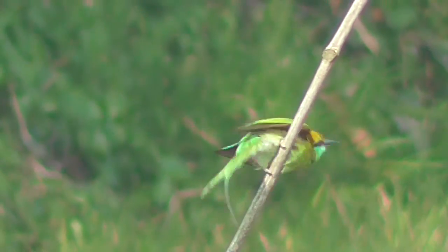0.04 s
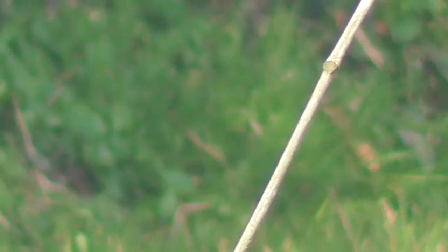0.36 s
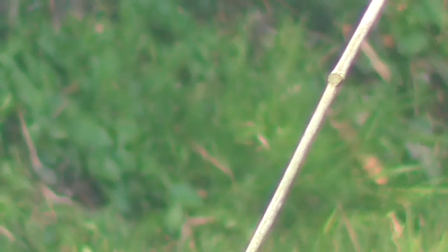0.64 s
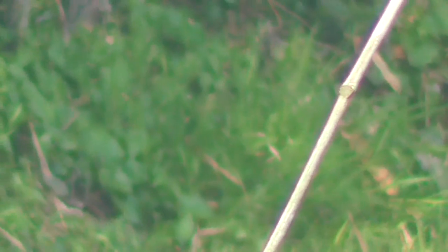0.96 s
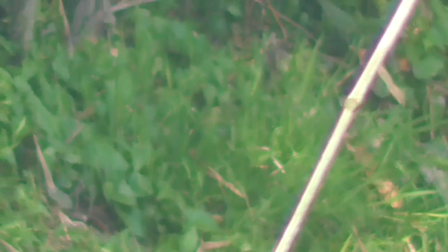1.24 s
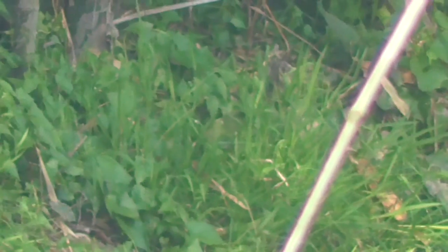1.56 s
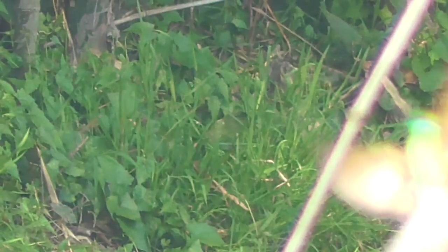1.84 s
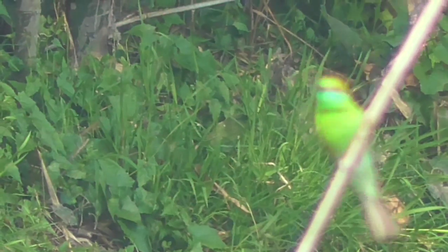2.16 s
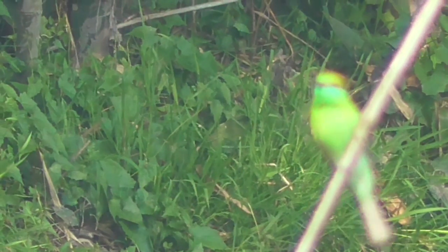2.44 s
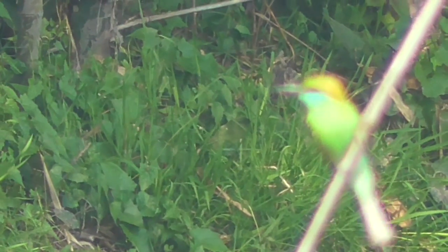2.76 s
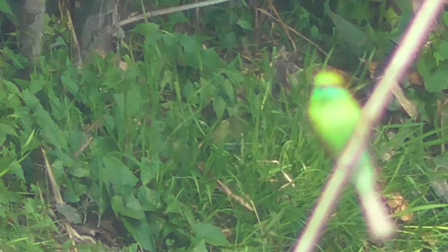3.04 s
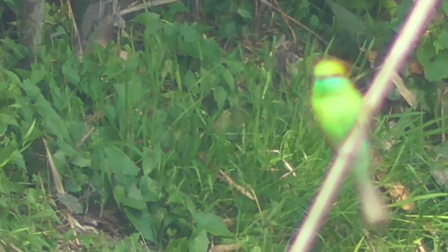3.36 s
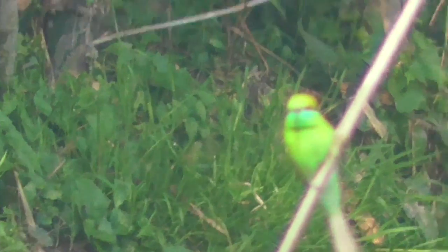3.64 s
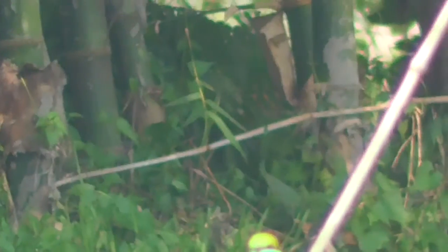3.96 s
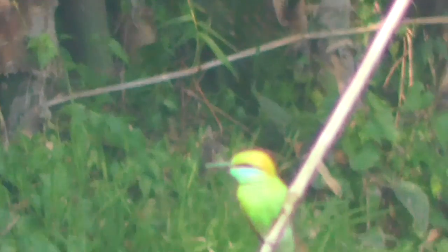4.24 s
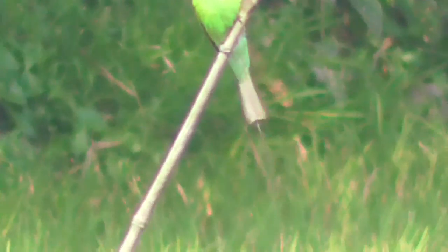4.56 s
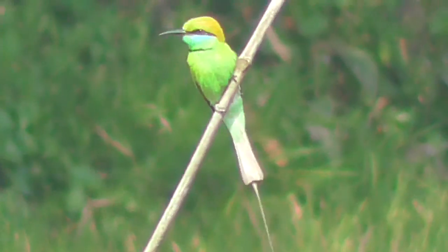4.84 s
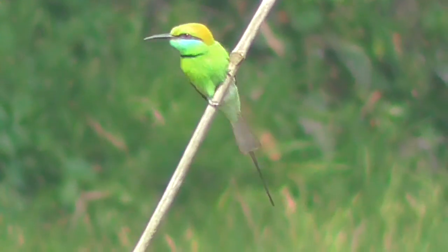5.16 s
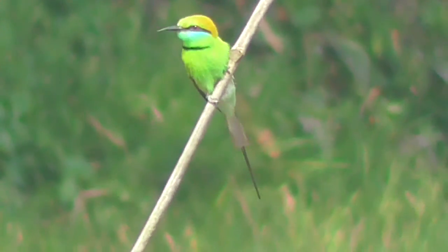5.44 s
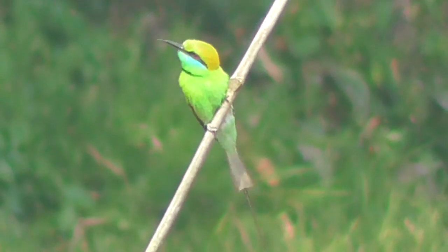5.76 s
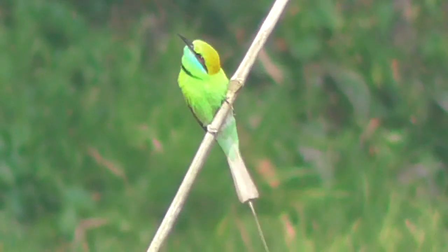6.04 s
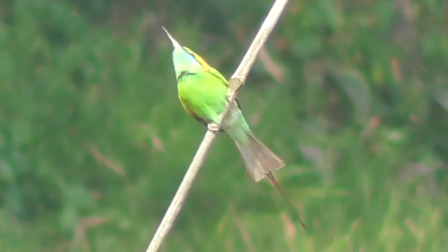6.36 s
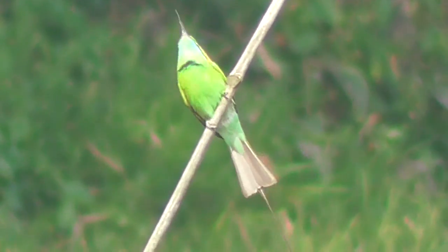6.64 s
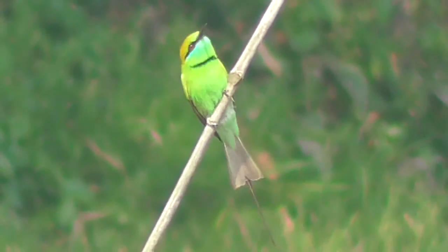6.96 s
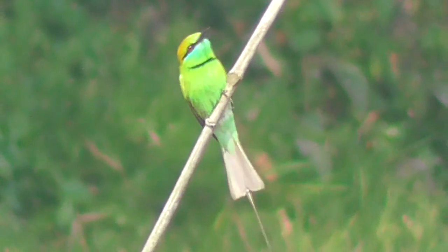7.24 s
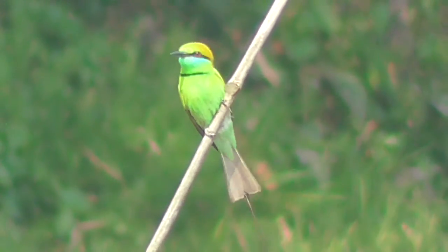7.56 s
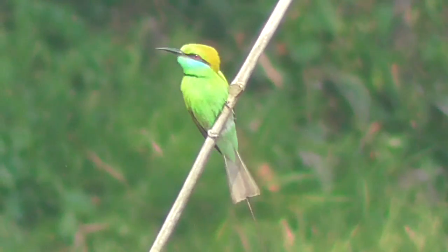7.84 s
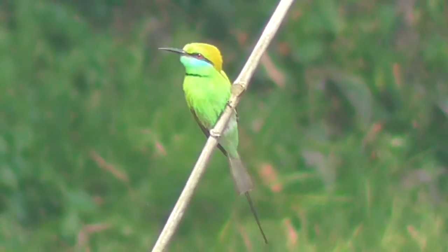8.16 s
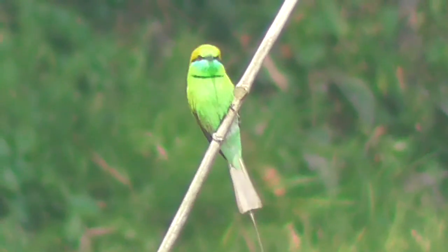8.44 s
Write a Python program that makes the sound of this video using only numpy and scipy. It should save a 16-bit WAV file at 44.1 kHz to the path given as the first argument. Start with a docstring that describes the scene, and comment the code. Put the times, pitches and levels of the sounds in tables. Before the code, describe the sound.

Low wind rumble swells and drops on the microphone at a meadow's edge, with dull bumps in the stronger gusts. Behind it lie a steady far traffic drone and a thin hiss. Small birds are heard faintly from the bushes: first a few quick chirps, then soft whistles and a series of paired high notes in the second half. Slight leaf rustles come close by, and distant brakes squeal softly twice.

```python
"""Gusts and small birds at a meadow's edge

Gusts buffet a stereo microphone: eddies rumble and thump on its two ports and once hoot across an edge.
Small birds whistle chirps, paired notes and soft slurs that scatter through a thicket.
Dry leaves rustle and tick close by. Far traffic, a motor's hum and two brake-like squeals lie below."""
import sys
import numpy as np
from scipy import signal
from scipy.fft import rfft, irfft
from scipy.io import wavfile
from scipy.ndimage import uniform_filter1d

SR = 44100
rng = np.random.default_rng(int(sys.argv[2]) if len(sys.argv) > 2 else 0)


def digitize_waveform(pressure):
    """Quantize a signal to 16-bit integers and store it at the path in sys.argv[1].

    Rows of a 2-D input are taken as channels; values are limited to [-1, 1].
    """
    field = np.atleast_2d(pressure).T
    bounded = np.clip(field, -1, 1)
    quanta = np.round(bounded * 32767).astype(np.int16)
    wavfile.write(sys.argv[1], SR, quanta)


N = 374850
TIME = np.arange(N) / SR

# the hoot's pitch, dipping and then climbing: time_s, pitch_hz
HOOT_PITCH = [(.56, 219.4), (.67, 134.7), (.76, 245.3), (.82, 239.6), (.87, 315.5), (.92, 301), (.975, 343)]
def edge_hoot(level_db, peak_s=0.83, swell_db_per_s=23, ramp_s=0.0064):
    """Eddies shed at an edge sound a ragged tone and its octave; returns the hoot and its 0-1 gate."""
    pitch = np.interp(TIME, *np.transpose(HOOT_PITCH))
    inside_s = np.minimum(TIME - HOOT_PITCH[0][0], HOOT_PITCH[-1][0] - TIME)
    gate = np.clip(1 + inside_s / ramp_s, 0, 1)
    octave = gain_of(-16) * wavering(2 * pitch, jitter=0.171, rate_hz=114)
    swell = gain_of(level_db - swell_db_per_s * abs(TIME - peak_s) + 3 * drift(33))
    return swell * gate * (wavering(pitch, jitter=0.089, rate_hz=73) + octave), gate


# rumble of turbulence between the ports: freq_hz, density_db
EDDY_SPECTRUM = [(12, -56), (20, -28), (97, -1), (148, -1), (202, -1.5), (327, -13), (471, -21),
                 (1040, -45.5), (1410, -57), (1680, -70), (2000, -60), (2600, -73), (4400, -120)]
# rumble of pressure on both ports alike: freq_hz, density_db
PRESSURE_SPECTRUM = [(20, -23), (50, -12), (80, -4), (140, 1.5), (230, -4), (340, -11), (500, -22),
                     (900, -54), (2000, -72), (4000, -99)]
# long swells of breeze with lulls between: time_s, turbulence_db, pressure_db
BREEZE_SWELLS = [(0, -45, -52.5), (.38, -50, -45.5), (.6, -22, -34.5), (.87, -25.5, -32),
                 (1.15, -34, -41.5), (2.15, -37, -43.5), (2.4, -57, -46), (2.8, -42.5, -44.5),
                 (3.15, -28.5, -38.5), (3.5, -32, -43), (3.82, -46.5, -45.5), (4.3, -21.5, -34),
                 (4.8, -28.5, -37.5), (6.1, -32.5, -36.5), (6.5, -34.5, -37), (6.95, -54, -50),
                 (7.7, -54, -49), (8.0, -34.5, -44), (8.5, -40.5, -52)]
# short puffs on top: peak_s, turbulence_db, pressure_db, half_length_s
AIR_PUFFS = [(1.234, -27, -43, 0.053), (1.464, -26, -38.5, 0.01), (1.552, -27, -37, 0.0084),
             (1.688, -28, -42, 0.023), (1.9, -30.5, -42, 0.023), (2.211, -27.5, -43, 0.027),
             (3.09, -32, -52, .025), (3.21, -30, -50, 0.016), (3.304, -22, -33.5, 0.023),
             (3.581, -24.5, -35, 0.049), (3.644, -30, -40, 0.011), (3.914, -30, -35, 0.041),
             (4.157, -33, -56, 0.029), (4.423, -33, -33.5, 0.13), (4.912, -27, -38, 0.009),
             (5.068, -25, -33.5, 0.044), (5.4, -24.5, -32, 0.075), (5.768, -25, -30.5, 0.014),
             (5.909, -28, -30, 0.019), (6.048, -30.5, -31, 0.074), (6.56, -33, -31, 0.017),
             (6.777, -36.5, -40, 0.034), (7.363, -40, -42, 0.01), (7.478, -43, -45, 0.027),
             (7.99, -30, -41, 0.041), (8.206, -30, -54, 0.023), (8.43, -30, -45, 0.021)]
# the wind veers, favouring the right port: time_s, right_minus_left_db
WIND_PAN = [(.8, 2.5), (2.5, 2.5), (4.6, 5), (6.0, 3), (7.0, 12), (8.0, 6)]
def wind(knee_hz=260, strong_db=-26, brighten=0.91, flutter_db=1.5, hoot_db=-25):
    """Turbulence hits the two ports in opposite phase; faster air makes smaller, brighter eddies."""
    times, turbulence_db, pressure_db = np.transpose(BREEZE_SWELLS)
    flutter = gain_of(flutter_db * drift(24))
    turbulence_puffs = swells((s, db, half) for s, db, _, half in AIR_PUFFS)
    pressure_puffs = swells((s, db, half) for s, _, db, half in AIR_PUFFS)
    turbulence = np.hypot(fader(times, turbulence_db) * flutter, turbulence_puffs)
    pressure = np.hypot(fader(times, pressure_db) * flutter, pressure_puffs)
    eddies = steadied(coloured(EDDY_SPECTRUM), seconds=0.0292)
    large = signal.sosfiltfilt(signal.butter(1, knee_hz, fs=SR, output="sos"), eddies)
    small = (eddies - large) * (turbulence / gain_of(strong_db)) ** brighten
    hoot, gate = edge_hoot(hoot_db)
    # eddies that lock into the tone duck the noise
    duck = 0.67 * np.minimum(gain_of(hoot_db) * gate / turbulence, 1)
    side = gain_of(-2) * turbulence * (large * (1 - duck) + small * (1 - duck / 2)) + hoot
    rumble = steadied(coloured(PRESSURE_SPECTRUM), seconds=0.06)
    mid = gain_of(-0.5) * pressure * (1 - duck) * rumble - 0.12 * hoot
    pan_db = np.interp(TIME, *np.transpose(WIND_PAN))
    return np.array([mid + side * gain_of(-pan_db / 2), mid - side * gain_of(pan_db / 2)])


# fine churn inside a thump: freq_hz, density_db
CHURN_SPECTRUM = [(80, -30), (300, 11), (600, -2.5), (900, -13), (1300, -32), (2000, -49), (4000, -80)]
# single eddies on the ports: peak_s, level_db, pitch_hz, left_minus_right_db, churn_share, half_length_s
EDDY_THUMPS = [(1.255, -19, 141, -13, .1, 0.0098), (3.224, -19, 147, -11, 0.085, 0.008),
               (3.314, -23, 235, -1, 0.5, 0.0054), (3.559, -12, 103, -7, 0.033, 0.0063),
               (3.92, -11, 139, -4, 0.1, 0.0058), (3.93, -17, 280, -7.5, 1, 0.0067),
               (4.15, -15, 200, 10, .09, 0.0052), (4.408, -13, 230, -3, .08, 0.0054),
               (5.174, -9.5, 242, 6.5, 0.092, .0035), (5.359, -15, 224, -6.5, 0.15, 0.006),
               (5.679, -17.5, 132, 19, 0.25, .0065), (5.781, -14.5, 206, 10, 0.18, .0065),
               (6.019, -13, 199, 23, .05, 0.0029), (6.0285, -12, 162, 26, 0.049, .0035),
               (6.205, -15.5, 100, -25, 0.079, 0.0068)]
def thumps():
    """Each eddy is a short pressure swing, opposite at the two ports, that breaks up into finer churn."""
    out = np.zeros((2, N))
    churn = steadied(coloured(CHURN_SPECTRUM), seconds=0.0116)
    for s, db, hz, balance_db, churn_share, half in EDDY_THUMPS:
        t = np.arange(-3 * half, 3 * half, 1 / SR)
        swing = np.cos(2 * np.pi * hz * t) + churn_share * churn[round(s * SR):][:len(t)]
        swing *= gain_of(db) * np.exp(-(t / half) ** 2) / np.hypot(1, gain_of(balance_db))
        add(out[0], s + t[0], gain_of(balance_db) * swing)
        add(out[1], s + t[0], -swing)
    return out


# rounded chirps: top_s, level_db, top_hz, rise_s, fall_s, ground_echo_db, thicket_send_db
BIRD_CHIRPS = [(2.385, -47, 4530, 0.0038, 0.0067, -16, -18), (2.828, -58.5, 3880, 0.021, .012, -3, -12),
               (2.939, -52.5, 4370, 0.029, .011, -2, -7), (2.991, -50, 4570, 0.025, 0.0096, -2, -10),
               (3.089, -45.5, 5100, 0.029, 0.024, -3.5, -15), (3.145, -48.5, 4710, 0.032, 0.016, -2, -8),
               (3.206, -50.5, 4400, 0.023, 0.011, -6, -12), (5.507, -59.5, 4230, 0.027, .02, -16, -8),
               (5.736, -58, 4400, 0.044, 0.063, -14, -4)]
def chirps(drop_share=0.36, ground_echo_s=0.00612):
    """A whistled pitch arch, brighter when louder, doubled by its echo off the ground."""
    direct, send = np.zeros((2, N))
    for s, db, top_hz, rise, fall, echo_db, send_db in BIRD_CHIRPS:
        t = np.arange(-rise, fall, 1 / SR)
        droop = np.where(t < 0, abs(t / rise) ** 2.1, abs(t / fall) ** 2.3)  # 0 at the top, 1 at the ends
        call = whistle(top_hz * (1 - drop_share * droop), overtone_db=db + 26)
        call *= gain_of(db - 15 * droop - 3 * np.maximum(t, 0) / fall) * signal.windows.tukey(len(t), 0.2)
        add(direct, s - rise, call)
        add(direct, s - rise + ground_echo_s, gain_of(echo_db) * call)
        add(send, s - rise, gain_of(send_db - 2) * call)
    return placed(direct, lag=1, balance_db=-2) + thicket(send, tail_db=3.5, t60_s=0.17, early_db=3)


# a second bird repeats one pointed note in pairs: top_s, level_db, top_hz, loudest_hz
BIRD_NOTES = [(6.0, -63, 4500, 3400), (6.138, -60.5, 4470, 3350), (6.372, -57, 4500, 3500),
              (6.51, -55, 4520, 3500), (6.734, -52.5, 4540, 3450), (6.878, -53, 4540, 3370),
              (7.094, -56, 4520, 3450), (7.239, -60, 4490, 3520), (7.449, -62.5, 4520, 3860),
              (7.592, -64, 4500, 3860), (7.85, -68, 4310, 4100), (7.99, -64.5, 4310, 4100),
              (8.247, -65, 4400, 4020), (8.377, -65, 4380, 4020)]
def paired_notes(low_hz=2484, rise_s=0.0118, fall_s=0.0168, stress_db_per_s=39, beak_skirt_db=7.5):
    """A steep whistled rise and a longer downsweep that levels out; the beak favours one pitch."""
    direct, send = np.zeros((2, N))
    t = np.arange(-1.7 * rise_s, 1.8 * fall_s, 1 / SR)
    arch = np.exp(-np.where(t < 0, abs(t / rise_s) ** 2.38, abs(t / fall_s) ** 1.38))
    for s, db, top_hz, loudest_hz in BIRD_NOTES:
        pitch = low_hz + (top_hz - low_hz) * arch
        off_khz = (pitch - loudest_hz) / 1000
        envelope = gain_of(stress_db_per_s * t - beak_skirt_db * off_khz ** 2)
        call = envelope * signal.windows.tukey(len(t), 0.3) * whistle(pitch)
        add(direct, s + t[0], gain_of(db - 0.5) * call)
        add(send, s + t[0], gain_of(-55 + 0.44 * (db + 55)) * call)  # the echoes vary less than the notes
    return placed(direct, lag=2.7, balance_db=-2) + thicket(send, tail_db=-7.5, t60_s=0.68, early_db=-4.5)


# soft slurs: middle_s, level_db, pitch_hz, length_s, arch_hz, glide_hz_per_s, hoarseness, direct_gain
BIRD_SLURS = [(0.185, -68, 3250, 0.1, 300, 4000, 1, .6), (2.025, -69, 2600, 0.045, 250, 0, .1, 1),
              (5.594, -69, 3880, .03, 150, -3000, 0.1, .6), (5.604, -63, 2960, 0.064, 94, 5500, .35, 0.87),
              (5.635, -68, 3800, .03, 80, 0, 0, 1.3), (5.667, -65.5, 2360, 0.042, -550, -2000, 0.06, 2.1),
              (5.694, -73, 2630, 0.031, -100, -5000, 0.1, 1.2), (5.975, -67, 3300, 0.045, 250, 0, 0.15, .9),
              (6.578, -63, 1940, 0.034, -120, 0, 0.07, 1.3), (6.607, -66, 2570, 0.05, 0, 16000, .2, 0.93),
              (6.713, -62, 2590, 0.044, -130, 3000, 0.04, 1.1),
              (6.776, -63, 3220, 0.064, 0, -2000, .15, .8),
              (6.845, -62, 2690, 0.026, 130, -2000, 0.2, 0.98), (6.877, -69, 2550, .045, 0, -2000, .1, .8)]
def slurs():
    """A bird deep in the leaves glides and bends low whistles; pitch jitter turns some hoarse."""
    direct, send = np.zeros((2, N))
    for s, db, hz, length, arch_hz, glide, hoarseness, direct_gain in BIRD_SLURS:
        t = np.arange(-length / 2, length / 2, 1 / SR)
        droop = (2 * t / length) ** 2
        call = whistle(hz + glide * t - arch_hz * droop, jitter=0.0086 + 0.13 * hoarseness)
        call *= gain_of(db - 6 * droop) * signal.windows.tukey(len(t), 0.25)
        add(direct, s - length / 2, direct_gain * call)
        add(send, s - length / 2, call)
    return placed(direct, lag=1, balance_db=-1) + thicket(send, tail_db=-4, t60_s=0.4, early_db=-1)


def whistle(hz, jitter=0.007, overtone_db=-32):
    """A bird's near-pure tone, with a fast tremble of pitch."""
    tremble = evened(uniform_filter1d(rng.standard_normal(len(hz)), size=70))
    hz = hz * (1 + jitter * tremble)
    return sine(hz) + gain_of(overtone_db) * sine(2 * hz)


def thicket(send, tail_db, t60_s, early_db):
    """Nearby leaves scatter a quick cluster of echoes, trunks a short diffuse tail."""
    t = np.arange(SR // 2) / SR
    trunks, leaves = rng.standard_normal((2, 2, len(t)))
    tail = evened(trunks * gain_of(-60 * t / t60_s) * (1 - np.exp(-t / 0.0057)))
    early = evened((leaves + leaves.mean(0)) * t * np.exp(-t / 0.0041))
    echoes = (gain_of(tail_db) * tail + gain_of(early_db) * early) / np.sqrt(len(t))
    return signal.fftconvolve(send[None], echoes, axes=1)[:, :N]


# dry leaf fizz: freq_hz, density_db
FIZZ_SPECTRUM = [(1000, -28), (2500, 4), (4200, -0.5), (6000, -1.5), (7800, 2), (11000, 0), (15500, -19)]
# the louder rustles: peak_s, level_db, half_length_s
LEAF_RUSTLES = [(.985, -72, .022), (1.737, -66.5, .021), (2.69, -66.5, 0.023), (2.798, -65.5, .026),
                (2.97, -63.5, 0.061), (4.122, -64, 0.042), (5.491, -68, 0.022), (8.143, -66, 0.02),
                (8.395, -64.5, 0.025)]
def rustles(stirs_per_s=1.3, snaps_per_s=500):
    """Dry leaves stir in brief clumps of soft fizz and sharper crackle; faint ones come at random."""
    stirs = [(s, -71, 0.007) for s in TIME[rng.random(N) < stirs_per_s / SR]]
    envelope = gain_of(-4) * swells(LEAF_RUSTLES + stirs)
    fizz = stereo_noise(FIZZ_SPECTRUM, centre_gain=0.99)
    snaps = rng.standard_normal(N) * (rng.random(N) < snaps_per_s / SR)
    crackle = evened(signal.sosfilt(signal.butter(2, 5500, "high", fs=SR, output="sos"), snaps))
    return envelope * (fizz * gain_of(3.2 * drift(200)) + 0.65 * crackle)


# single leaf snaps: start_s, level_db, pitch_hz, decay_s
LEAF_TICKS = [(0.976, -62, 10200, .012), (1.001, -57, 7700, .004), (1.283, -60, 10000, .007),
              (1.346, -61, 7700, .012), (1.571, -61, 8000, .016), (1.726, -55, 12500, .005),
              (1.741, -56, 4600, .003), (2.441, -64, 8100, .003), (2.788, -55, 4750, 0.0073),
              (2.81, -55, 11500, .002), (2.967, -54, 8000, .004), (4.084, -58, 7500, .004),
              (4.12, -54, 7700, .008), (8.145, -60, 4900, .005), (8.386, -55, 9400, .004)]
def ticks(width_share=0.22, attack_share=0.4):
    """A dry leaf snaps: a burst of noise around one pitch that dies at once."""
    out, t = np.zeros((2, N)), np.arange(SR // 10) / SR
    for s, db, hz, decay in LEAF_TICKS:
        band = signal.iirpeak(hz, 1 / width_share, fs=SR)
        left, right, centre = signal.filtfilt(*band, rng.standard_normal((3, len(t))), padtype=None)
        envelope = gain_of(db + 1) * (1 - np.exp(-t / (attack_share * decay))) * np.exp(-t / decay)
        add(out[0], s, envelope * evened(left + centre))
        add(out[1], s, envelope * evened(right + centre))
    return out


# far squeals, as of brakes: peak_s, level_db, pitch_hz, glide_hz_per_s, jitter_share
FAR_SQUEALS = [(6.78, -47, 839, 10, 0.0201), (8.46, -50.5, 954, -300, 0.0356)]
def squeals(swell_db_per_s=30, fade_db_per_s=64, scoop_hz_per_s=250):
    """Each unsteady tone scoops up to its pitch, swells slowly and fades fast."""
    out = np.zeros(N)
    for s, db, hz, glide, jitter in FAR_SQUEALS:
        t = TIME - s
        fade_db = np.maximum(-t * swell_db_per_s, t * fade_db_per_s)
        scoop = scoop_hz_per_s * np.clip(t + 0.3, -0.5, 0)
        pitch = hz + scoop + glide * np.clip(t, -0.15, 0.3)
        out += gain_of(db - fade_db) * wavering(pitch, jitter, rate_hz=53.6)
    return out


# steady tones of a far motor and of the camera: pitch_hz, level_db, width_hz
HUM_TONES = [(125.8, -48, 17.4), (538, -65, 12.4), (820, -87, 10), (9350, -89, 40), (13700, -97, 43)]
def hum():
    """A motor's drone and the camera's faint whine, each tone a narrow band of noise."""
    out = np.zeros(N)
    for hz, db, width_hz in HUM_TONES:
        pitch = np.full(N, hz)
        out += gain_of(db) * (drift(width_hz) * sine(pitch) + drift(width_hz) * sine(pitch))
    return out


# the traffic bed in the centre: freq_hz, density_db
TRAFFIC_MID_SPECTRUM = [(20, -35), (50, -13.5), (80, -8.5), (125, -1), (165, -5), (240, -4.5), (350, -9.5),
                        (480, -17), (1000, -16), (1250, -21.5), (1600, -35), (2000, -33), (2500, -42.5),
                        (7000, -58)]
# the part that arrives from the sides: freq_hz, density_db
TRAFFIC_SIDE_SPECTRUM = [(20, -11), (60, 4.5), (125, -4.5), (200, -10), (300, -18), (480, -15),
                         (700, -16.5), (1000, -14), (1300, -18), (1700, -29), (3000, -44), (7000, -63)]
# the traffic eases off a little and returns: time_s, level_db
TRAFFIC_FADER = [(0, -41), (2.6, -42), (5.0, -43), (6.5, -42), (8.5, -42)]
def far_traffic():
    """Traffic, with the hum and squeals mixed in, arrives nearly alike at both ports."""
    level = fader(*np.transpose(TRAFFIC_FADER))
    mid = level * coloured(TRAFFIC_MID_SPECTRUM) + hum() + squeals()
    side = gain_of(-12) * level * coloured(TRAFFIC_SIDE_SPECTRUM)
    return placed(mid, lag=0, balance_db=1.5) + np.array([side, -side])


# the noise floor: freq_hz, density_db
HISS_SPECTRUM = [(300, 3), (2000, 3.5), (3000, 5), (4300, 7), (5200, 1.5), (6300, -1.5), (7600, 3.5),
                 (10500, 3), (13000, 2), (15500, -3)]
def hiss():
    """A thin, wide hiss, a touch louder on the right."""
    return gain_of([[-66.3], [-65.7]]) * stereo_noise(HISS_SPECTRUM, centre_gain=0.11)


def gain_of(db):
    """Decibels to amplitude."""
    return 10 ** (np.asarray(db) / 20)


def evened(x):
    """Scales to rms 1."""
    return x / np.sqrt(np.mean(x ** 2) + 1e-30)


def coloured(spectrum):
    """Noise of rms 1 with the given spectrum."""
    hz, db = np.transpose(spectrum)
    shape = gain_of(np.interp(np.log(np.fft.rfftfreq(N, 1 / SR) + 1), np.log(hz), db))
    return evened(irfft(rfft(rng.standard_normal(N)) * shape, N))


def stereo_noise(spectrum, centre_gain):
    """Separate noise left and right, plus a layer common to both."""
    return np.array([coloured(spectrum), coloured(spectrum)]) + centre_gain * coloured(spectrum)


def drift(rate_hz):
    """A smooth random wander of rms 1."""
    shape = np.exp(-(np.fft.rfftfreq(N, 1 / SR) / rate_hz) ** 2)
    return evened(irfft(rfft(rng.standard_normal(N)) * shape, N))


def fader(times_s, levels_db):
    """Amplitude along a curve of times and levels."""
    return gain_of(np.interp(TIME, times_s, levels_db))


def swells(rows):
    """Amplitude of bell-shaped swells from rows of peak_s, level_db, half_length_s."""
    out = np.zeros(N)
    for s, db, half in rows:
        near = slice(*np.searchsorted(TIME, [s - 5 * half, s + 5 * half]))
        out[near] += gain_of(db) * np.exp(-((TIME[near] - s) / half) ** 2 / 2)
    return out


def sine(hz):
    """A tone that follows a pitch curve."""
    return np.sin(2 * np.pi * (np.cumsum(hz) / SR + rng.random()))


def wavering(hz, jitter, rate_hz):
    """An unsteady tone of rms 1 along a pitch curve."""
    return np.sqrt(2) * sine(hz * (1 + jitter * drift(rate_hz)))


def steadied(x, seconds):
    """Evens out the slow swings of a noise and keeps its grain."""
    return x / np.sqrt(abs(uniform_filter1d(x ** 2, int(seconds * SR))) + 1e-9)


def add(mix, start_s, sound):
    """Mixes a sound in at start_s."""
    part = mix[max(round(start_s * SR), 0):][:len(sound)]
    part += sound[:len(part)]


def placed(x, lag, balance_db):
    """Pans a source: the left port hears it lag samples late; balance_db is left minus right."""
    late = irfft(rfft(x) * np.exp(-2j * np.pi * np.fft.rfftfreq(N) * lag), N)
    return np.array([late * gain_of(balance_db / 2), x * gain_of(-balance_db / 2)])


def scene():
    """Birds and the far background, with wind at the microphone and leaves close by."""
    birds = chirps() + slurs() + paired_notes()
    background = far_traffic() + hiss()
    return birds + background + wind() + thumps() + rustles() + ticks()


def record(dry, low_cut_hz=28, high_cut_hz=15700):
    """Trims the deepest rumble and the highest treble."""
    thinned = signal.sosfiltfilt(signal.butter(1, low_cut_hz, "high", fs=SR, output="sos"), dry)
    band_limit = signal.firwin(511, high_cut_hz, window=("kaiser", 9), fs=SR)
    return signal.oaconvolve(thinned, band_limit[None], "same")


dry = scene()
out = record(dry)
digitize_waveform(out)
```